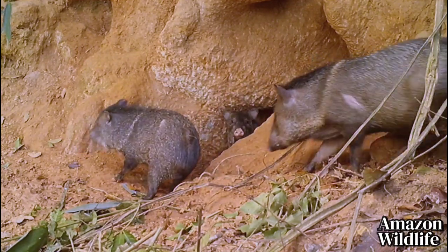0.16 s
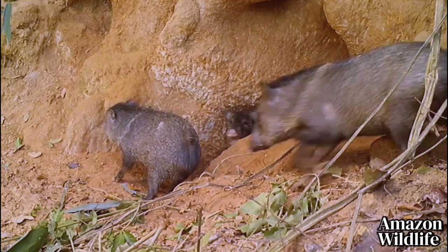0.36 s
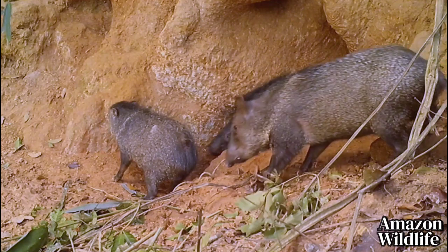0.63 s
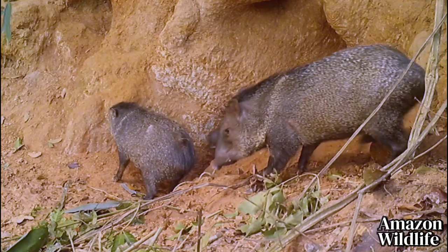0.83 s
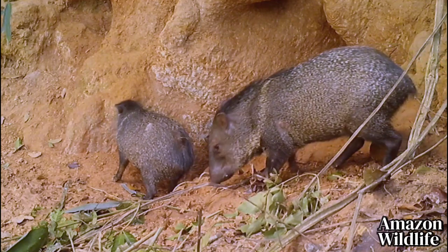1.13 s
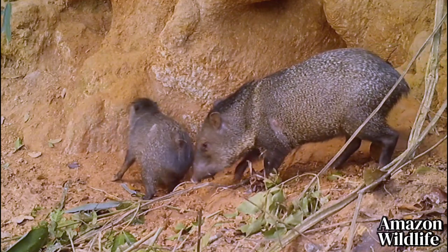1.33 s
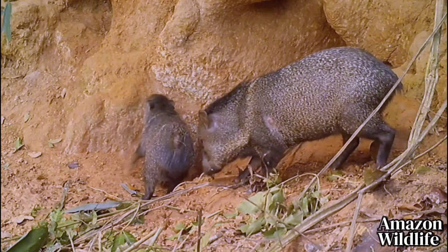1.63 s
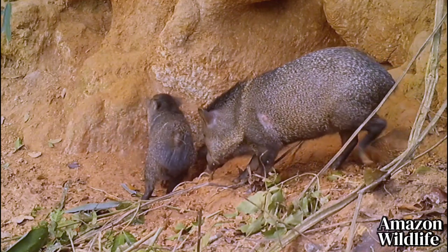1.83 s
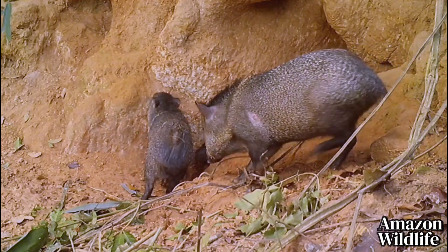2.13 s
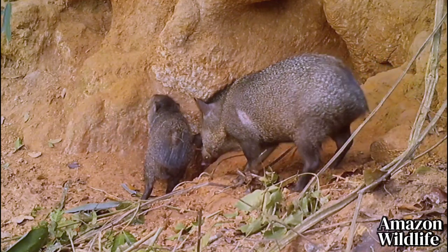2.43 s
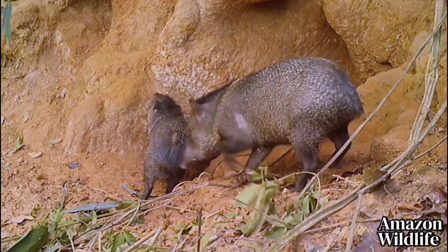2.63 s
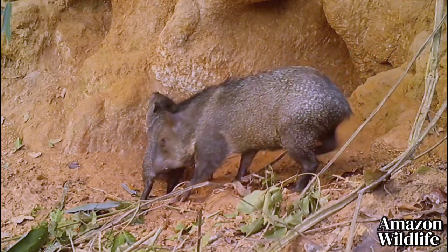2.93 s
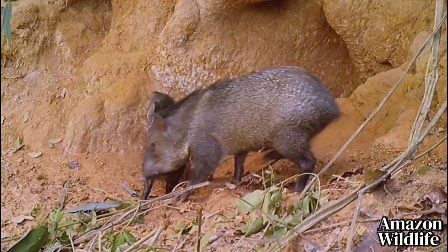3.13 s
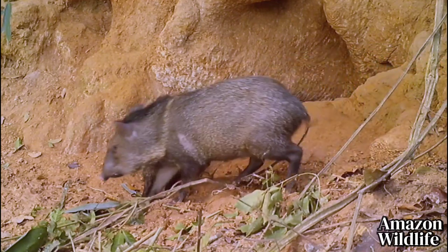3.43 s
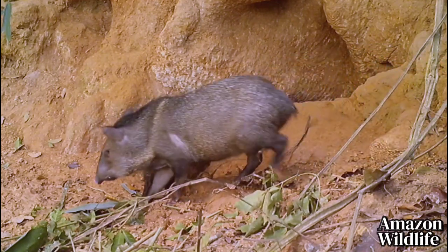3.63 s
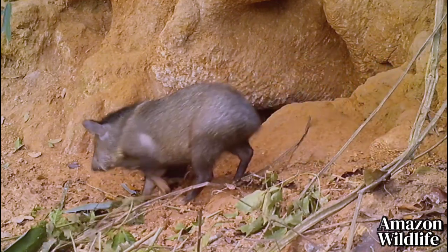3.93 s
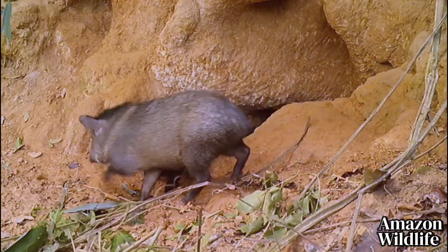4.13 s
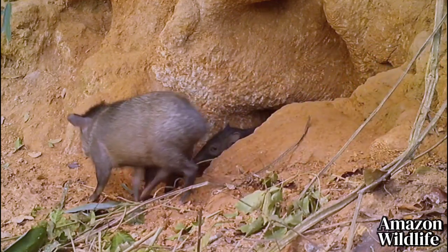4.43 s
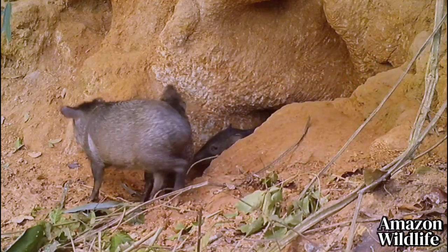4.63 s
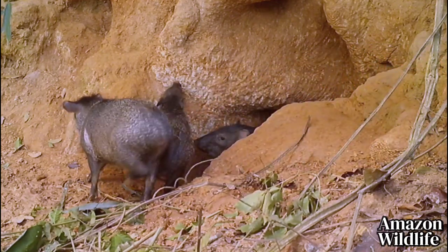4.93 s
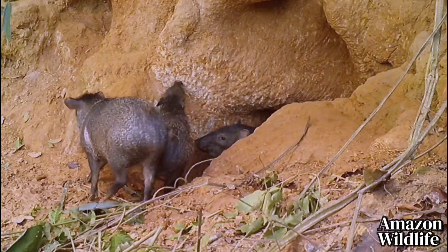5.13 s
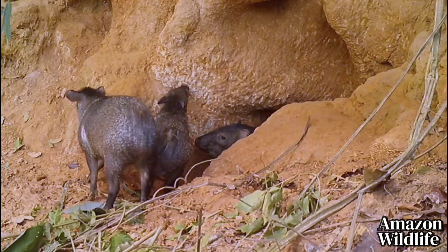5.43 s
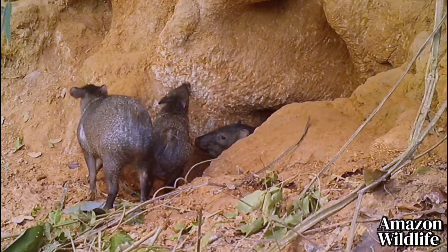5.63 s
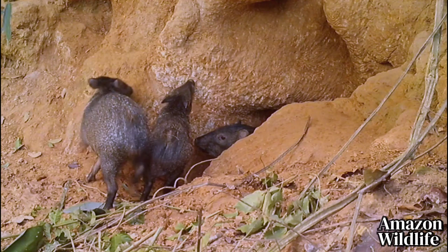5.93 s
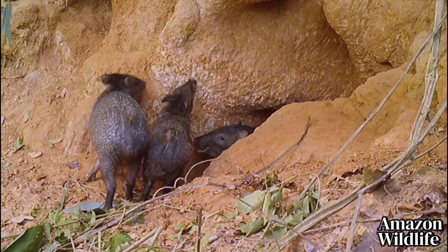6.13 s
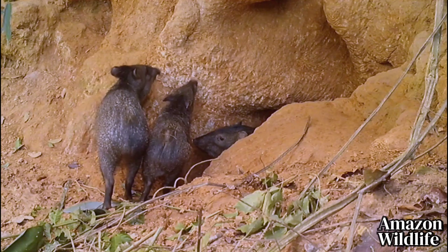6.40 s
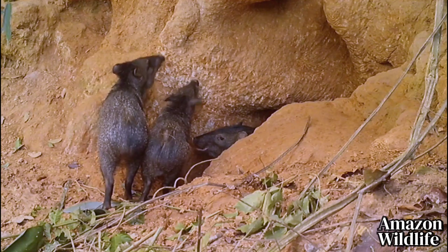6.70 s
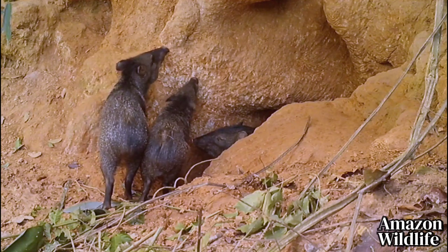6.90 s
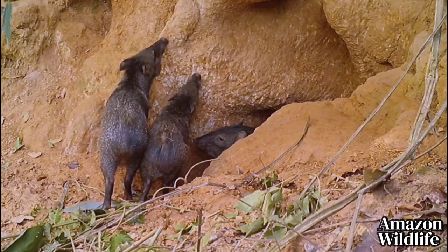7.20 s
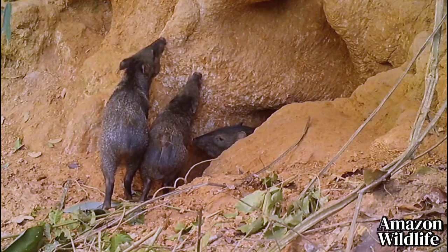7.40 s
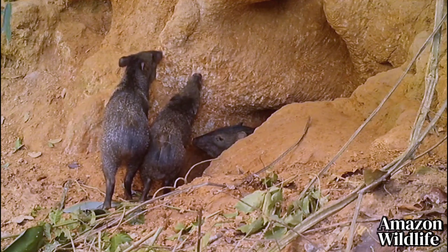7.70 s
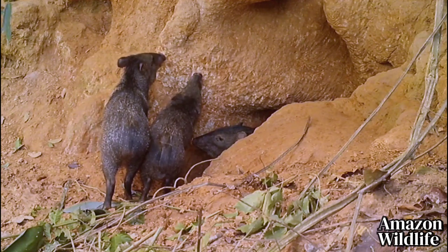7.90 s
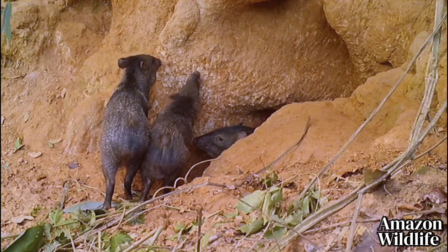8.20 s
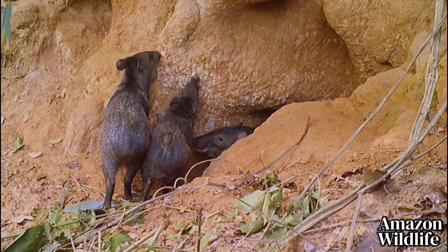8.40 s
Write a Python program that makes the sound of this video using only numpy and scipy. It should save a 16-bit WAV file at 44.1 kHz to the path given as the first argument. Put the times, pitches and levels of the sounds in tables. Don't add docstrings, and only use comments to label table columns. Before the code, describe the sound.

In a tropical forest by a clay bank, two kinds of small singers chirp without pause: buzzy rising chirps near four kilohertz and thinner, quieter trills above five, blurred by trees. Close by, peccaries scuff crisp leaves and snap twigs, with a bright cluster in the first second, scattered cracks after, and a burst just before five seconds. Faint birds coo and whistle behind; two tiny grunts come later. Single-channel pickup, close to the animals, treble softened.

```python
import sys
import numpy as np
from scipy import signal
from scipy.fft import rfft, irfft, next_fast_len
from scipy.io import wavfile
from scipy.ndimage import uniform_filter1d, map_coordinates

SR = 44100
rng = np.random.default_rng(int(sys.argv[2]) if len(sys.argv) > 2 else 0)


def store_wav(level_fs):
    pcm = np.round(np.clip(np.atleast_2d(level_fs), -1, 1) * 32767)
    wavfile.write(sys.argv[1], SR, pcm.T.astype(np.int16))


def gain_from_decibels(decibels):
    exponent = np.asarray(decibels, float) / 20
    return 10 ** exponent


N = 377055


def unit(x):
    return x / np.sqrt(np.mean(x ** 2, axis=-1, keepdims=True) + 1e-20)


def peak_one(x):
    return x / np.abs(x).max(axis=1, keepdims=True)


def along(points, hz):
    f, v = np.transpose(points)
    return gain_from_decibels(np.interp(np.log(hz + 1), np.log(f + 1), v))


def wobble(rate, size=N):
    knots = rng.standard_normal(int(size * rate / SR) + 4)
    return map_coordinates(knots, [np.arange(size) * rate / SR])


def filtered(x, response):
    m = next_fast_len(x.shape[-1] + 8192)
    return irfft(rfft(x, m) * response(np.fft.rfftfreq(m, 1 / SR)), m)[..., :x.shape[-1]]


def resonance(centre_hz, width_hz):
    return lambda f: 1j * f * width_hz / (centre_hz ** 2 - f * f + 1j * f * width_hz)


def place(times, sounds):
    at = np.round(times * SR).astype(int)[:, None] + np.arange(sounds.shape[1])
    return np.bincount(at.ravel(), sounds.ravel(), N + SR)[:N]


def scattered(sounds, wet_db, t60):
    t = np.arange(round(SR * np.clip(2 * t60, .2, .5))) / SR
    tail = rng.standard_normal((len(sounds), len(t))) * gain_from_decibels(-60 * t / t60) * (t > .003)
    tail = tail / np.linalg.norm(tail, axis=1, keepdims=True)
    echo = signal.fftconvolve(sounds, tail, axes=1)[:, :len(t)]
    direct = np.pad(sounds, ((0, 0), (0, len(t) - sounds.shape[1])))
    return direct + gain_from_decibels(wet_db) * echo


def chorus():
    # f/Hz, density/dB per Hz
    air_spectrum = [(14, -28), (32, -1.5), (60, -9.5), (200, -13.5), (700, -11), (1500, -13), (2400, -13),
                    (3500, -14.5), (4600, -32.5), (6300, -18), (7500, -19.5), (9000, -17.5)]
    # f/Hz, width/Hz, level/dB
    bands = [(2800, 620, -64), (3904, 380, -61), (5460, 1020, -62)]
    hiss = unit(filtered(rng.standard_normal(N), lambda hz: along(air_spectrum, hz)))
    out = gain_from_decibels(-58.5 + 0.17 * wobble(2.2)) * hiss
    for hz, width, db in bands:
        band = filtered(rng.standard_normal(N), lambda f: resonance(hz, width)(f) ** 2)
        out = out + gain_from_decibels(db + 1.1 * wobble(5) + 1.7 * wobble(14)) * unit(band)
    return out


def crackle(centre_hz, spread, cycles, size_db, count):
    luck, t = rng.random((count, 3)), np.arange(400) / SR
    hz = centre_hz * np.exp(spread * rng.standard_normal((count, 1)))
    size = gain_from_decibels(-size_db * np.log(luck[:, 1:2] + 0.06))
    ticks = size * np.exp(-t * hz / cycles) * np.sin(2 * np.pi * hz * t)
    return unit(place(luck[:, 0] * N / SR, ticks))


def scuffs():
    # f/Hz, density/dB per Hz
    litter = [(180, -44), (300, -34), (476, -27), (518, -29.5), (1960, -10), (2480, -5.5), (2850, 5.5),
              (6890, -17.5), (8500, -33.5), (11000, -64.5), (18700, -120)]
    # t/s, drag length/s, effort level/dB, weight level/dB
    drags = [(0.294, 0.065, -57, -10), (0.38, .03, -50, -16), (0.452, 0.037, -41, -10),
             (0.516, 0.014, -44, -2), (0.93, 0.27, -58.5, -7), (1.553, 0.17, -57.5, -8),
             (1.887, 0.025, -57, -9), (2.411, 0.036, -49.5, -7), (2.593, 0.06, -51, -4),
             (2.727, 0.14, -56.5, -1.5), (3.385, 0.11, -50.5, -3), (3.62, 0.3, -58.5, -17),
             (3.977, .12, -51, -3), (4.367, 0.12, -58, -21), (4.612, 0.091, -54, 0), (4.79, .03, -53.5, -2),
             (5.308, 0.026, -54.5, 5.5), (5.646, 0.14, -62, -1), (6.595, 0.018, -54, -0.5),
             (6.757, 0.022, -53, -1.5), (7.598, 0.032, -50.5, -5.5), (8.04, 0.12, -63, -4),
             (8.406, 0.019, -65, 8.5)]
    rise_db_per_s, fall_db_per_s = 258, 131.5
    stir_db = -62.5
    s, length, effort_db, weight_db = np.transpose(drags)[:, :, None]
    t = np.arange(0, N / SR + .01, .002)
    before, after = np.maximum(s - t, 0), np.maximum(t - s - length, 0)
    drag = gain_from_decibels(effort_db - rise_db_per_s * before - fall_db_per_s * after)

    def level(each):
        total = np.sqrt(np.sum(each ** 2, axis=0) + gain_from_decibels(stir_db) ** 2)
        return np.interp(np.arange(N) / SR, t, total)

    def rustle(split):
        grain = rng.standard_normal(N) * gain_from_decibels(2.7 * wobble(500))
        return unit(filtered(grain, lambda hz: along(litter, hz) / np.sqrt(1 + split(hz))))

    crisp = rustle(lambda hz: (2200 / (hz + 1)) ** 6)
    crisp = crisp + 0.81 * crackle(3000, spread=0.297, cycles=4.6, size_db=4.0, count=5000)
    crisp = crisp + 0.4 * crackle(5650, spread=.22, cycles=1.6, size_db=4.5, count=4000)
    dull = rustle(lambda hz: (hz / 2100) ** 8)
    dull = dull + 0.44 * crackle(1793, spread=.18, cycles=4.3, size_db=5.0, count=4000)
    heavy = level(drag * gain_from_decibels(weight_db))
    return gain_from_decibels(-3.0) * (level(drag) * crisp + gain_from_decibels(0.4) * heavy * dull)


def singers(calls, length, climb_hz, start_hz, pulse_hz, depth, gain_db, wet_db, t60, lead, bend, rough, attack):
    s, db = np.transpose(calls)[:, :, None]
    luck = rng.standard_normal((len(calls), 4))
    t = np.arange(SR // 5) / SR
    u = np.clip(t / np.clip(length * (1 + 0.055 * luck[:, 3:]), .03, .19), 0, 1)
    hz = (start_hz + climb_hz * u ** bend) * (1 + 0.00423 * luck[:, :1])
    pace = pulse_hz * (1 + 0.1443 * luck[:, 1:2]) * (1 + .3 * u)
    beat = np.cos(2 * np.pi * np.cumsum(pace, axis=1) / SR + 2 * luck[:, 2:3])
    swell = np.abs(np.sin(np.pi * u ** 0.44)) ** attack
    rasp = rough * unit(uniform_filter1d(rng.standard_normal(hz.shape), size=90))
    carrier = np.sin(2 * np.pi * np.cumsum(hz, axis=1) / SR)
    tone = swell * (1 + depth * beat + rasp) * carrier
    return place(s[:, 0] - lead, scattered(gain_from_decibels(db + gain_db) * tone, wet_db, t60))


def high_singers():
    # t/s, peak level/dB
    first_calls = [(0.061, -46), (0.548, -47), (0.849, -56), (1.05, -52), (1.274, -47.5), (1.577, -53),
                   (1.879, -54), (2.149, -52.5), (2.378, -47), (2.616, -50), (2.75, -47), (3.134, -45.5),
                   (3.302, -49), (3.489, -45.5), (3.753, -46), (4.043, -47), (4.37, -46), (4.769, -47),
                   (5.134, -45), (5.407, -53.5), (5.579, -44.5), (6.083, -49), (6.384, -52), (6.704, -49.5),
                   (7.163, -49), (7.311, -48), (7.531, -51), (7.717, -47.5), (7.983, -49), (8.317, -47.5)]
    # t/s, peak level/dB
    more_calls = [
        (5.82, -53.5),
        (6.952, -61),
        (8.498, -45.5),
    ]
    return singers(first_calls + more_calls, length=.1, climb_hz=551, lead=.004, bend=.75, rough=0.84,
                   attack=0.55, start_hz=5227, pulse_hz=200.0, depth=2.36, gain_db=-14.0, wet_db=3.0, t60=0.77)


def low_singers():
    # t/s, peak level/dB
    first_singer = [(0.094, -42), (0.37, -48.5), (0.632, -40.5), (1.019, -42.5), (1.382, -40.5),
                    (1.718, -38.5), (2.043, -40.5), (2.38, -38.5), (2.784, -41.5), (3.121, -41.5),
                    (3.448, -37.5), (3.859, -42.5), (4.195, -43), (4.531, -42), (4.902, -41), (5.284, -40),
                    (5.68, -41), (6.071, -40.5), (6.385, -42.5), (6.719, -38.5), (7.114, -40.5),
                    (7.531, -40.5), (7.886, -40.5), (8.304, -40)]
    # t/s, peak level/dB
    second_singer = [(0.228, -40.5), (0.505, -41.5), (0.869, -50), (1.067, -41), (2.224, -42),
                     (2.62, -41.5), (3.033, -41), (3.789, -42), (4.038, -47), (4.265, -41), (4.68, -42.5),
                     (5.088, -42.5), (5.475, -44), (5.893, -44), (6.292, -41.5), (6.468, -46), (7.035, -53),
                     (7.413, -50), (7.582, -42.5), (7.738, -52), (7.951, -44.5), (8.1, -47), (8.504, -49)]
    return singers(first_singer + second_singer, length=.077, climb_hz=369, lead=.008, bend=.95, rough=0.43,
                   attack=0.62, start_hz=3863, pulse_hz=87.7, depth=0.59, gain_db=-8, wet_db=2.65, t60=0.85)


def snaps(breaks, crack_db, knock_db, t60, width):
    s, db, hz = np.transpose(breaks)[:, :, None]
    t = np.arange(SR // 10) / SR
    noise = rng.standard_normal((len(breaks), 4, len(t)))
    splinters = gain_from_decibels(3.5 * unit(uniform_filter1d(noise[:, 3], size=60)))
    fade = splinters * gain_from_decibels(-60 * t / t60) + 1.47 * np.exp(-t / 0.00048)
    ring = filtered(fade * noise[:, 0], lambda f: resonance(hz, width * hz)(f) ** 2)
    crack = filtered(fade * noise[:, 1],
                     lambda f: resonance(3200, 900)(f) ** 2 + 0.082 * resonance(5200, 4500)(f))
    knock = filtered(fade * noise[:, 2],
                     lambda f: resonance(900, 500)(f) ** 2 + 0.55 * resonance(480, 350)(f) ** 2)
    parts = peak_one(ring) + gain_from_decibels(crack_db + 9) * peak_one(crack) + gain_from_decibels(knock_db + 5.5) * peak_one(knock)
    return place(s[:, 0], scattered(gain_from_decibels(db - 6.0) * parts, wet_db=-3.0, t60=0.071))


def twigs():
    # t/s, peak level/dB, ring f/Hz
    dry_breaks = [(0.282, -39, 2500), (0.368, -37, 2580), (0.414, -25.5, 2740), (0.453, -23.5, 2640),
                  (0.546, -24, 3020), (0.664, -53, 2430), (0.909, -33, 2100), (0.918, -41, 1600),
                  (1.439, -34.5, 2650), (1.907, -36, 2010), (2.074, -54, 2500), (2.379, -33.5, 2590),
                  (2.405, -41, 2700), (2.417, -26.5, 2540), (2.564, -33, 2600), (2.628, -31.5, 2620),
                  (3.317, -35.5, 2220), (3.429, -36, 2120), (4.68, -35.5, 1490), (4.687, -35, 3200),
                  (5.322, -37, 1910), (5.334, -39, 1600), (3.985, -43, 3400), (6.608, -41, 3000),
                  (6.905, -41, 3300), (7.593, -36, 3200), (8.48, -48, 2520), (8.523, -32, 3100)]
    return snaps(dry_breaks, crack_db=-6.5, knock_db=-30, t60=.024, width=.5)


def pops():
    # t/s, peak level/dB, ring f/Hz
    damp_breaks = [(0.396, -30.5, 1620), (0.487, -33, 2280), (0.886, -39, 1700), (1.883, -43, 1440),
                   (2.099, -42, 2000), (3.381, -31, 2100), (3.939, -37, 2170), (4.312, -39.5, 1480),
                   (4.349, -44.5, 1180), (4.707, -33, 1970), (4.8, -39, 1570), (4.817, -27, 1850),
                   (4.826, -25.5, 2130), (4.833, -36, 1500), (5.114, -41, 2580), (5.262, -43, 2050),
                   (5.482, -28.5, 2180), (6.234, -34.5, 1890), (6.599, -36, 1880), (6.903, -34.5, 1850),
                   (8.521, -28.5, 1800), (7.69, -44, 1650), (6.988, -40, 1900), (7.09, -38, 2000),
                   (7.362, -39, 2140), (8.075, -29, 1720), (8.08, -32, 1700)]
    return snaps(damp_breaks, crack_db=-15, knock_db=-25, t60=.034, width=.27)


def birds(calls, spread_hz):
    out = np.zeros(N)
    for s, length, start_hz, end_hz, db in calls:
        u = np.linspace(0, 1, round(length * SR))
        phase = 2 * np.pi * np.cumsum(start_hz + (end_hz - start_hz) * u) / SR
        in_phase = wobble(2 * spread_hz, len(u)) * np.cos(phase)
        quadrature = wobble(2 * spread_hz, len(u)) * np.sin(phase)
        swell = gain_from_decibels(db + wobble(15, len(u))) * np.abs(np.sin(np.pi * u)) ** .3
        out[round(s * SR):][:len(u)] += swell * (in_phase + quadrature)
    return out


def coos():
    # t/s, length/s, start f/Hz, end f/Hz, level/dB
    hoarse_calls = [
        (2.55, .35, 960, 850, -65.5),
        (2.95, .45, 900, 850, -67),
        (2.8, .62, 1030, 1030, -67),
        (3.4, .85, 820, 750, -71),
        (4.85, .12, 2850, 2780, -58),
        (5.58, .45, 2800, 2850, -67),
        (1.5, .26, 3420, 3450, -62),
        (8.09, .17, 3560, 3520, -62),
        (7.05, .35, 2320, 2300, -68),
    ]
    return birds(hoarse_calls, spread_hz=100)


def clods():
    # t/s, peak level/dB, ring f/Hz
    hoof_knocks = [(1.689, -41, 2470), (2.819, -40.5, 1430), (3.489, -41, 2300), (3.565, -40, 1710),
                   (3.662, -46, 2090), (3.781, -40.5, 1840), (4.209, -48.5, 830), (4.586, -37.5, 2550),
                   (4.851, -36, 1050), (8.07, -38, 990), (5.329, -33, 2000), (5.875, -41, 2100),
                   (7.981, -45, 2460), (8.067, -31, 1900)]
    return snaps(hoof_knocks, crack_db=-12, knock_db=-12, t60=.01, width=.5)


def stamp():
    start_s, length_s, hz, db = 1.99, .15, 60, -65
    t = np.arange(N) / SR - start_s
    return gain_from_decibels(db) * np.sin(np.pi * np.clip(t / length_s, 0, 1)) * np.sin(2 * np.pi * hz * t)


def whistles():
    # t/s, length/s, start f/Hz, end f/Hz, level/dB
    clear_calls = [
        (3.05, .28, 2330, 2200, -66),
        (8.1, .42, 2330, 2290, -65),
        (5.92, .13, 3340, 3450, -65),
    ]
    return birds(clear_calls, spread_hz=30)


def grunts():
    # t/s, level/dB, pitch f/Hz, snout f/Hz, chest level/dB
    throat_calls = [
        (6.067, -58, 131.6, 637, -5),
        (7.11, -56, 126, 490, 2),
    ]
    out, t = np.zeros(N), np.arange(N) / SR
    for s, db, pitch_hz, snout_hz, chest_db in throat_calls:
        u = np.clip((t - s) / 0.051, 0, 1)
        gate = np.abs(np.cos(np.pi * pitch_hz * (t - s) * (1 + 0.18 * u))) ** 12
        pulses = np.abs(np.sin(np.pi * u ** 0.35)) * gate * (1 + 1.07 * wobble(1500))

        def tract(f):
            snout = resonance(snout_hz, 250)(f) ** 2
            throat = 0.7 * resonance(400, 250)(f) ** 2
            chest = gain_from_decibels(chest_db - 1.5) * resonance(135, 70)(f) ** 2
            return snout + throat + chest

        voice = filtered(pulses, tract)
        out += gain_from_decibels(db + 10.5) * voice / np.abs(voice).max()
    return out


def scene():
    forest = chorus() + high_singers() + low_singers()
    herd = scuffs() + twigs() + pops() + clods() + stamp() + grunts()
    return (forest + herd + coos() + whistles())[None]


def top_cut(x):
    return signal.sosfilt(signal.butter(12, 15490, fs=SR, output="sos"), x)


def record(dry):
    edge_hz, edge_db = 7070, 8.5

    def roll_off(hz):
        above_khz = np.maximum(hz - edge_hz, 0) / 1000
        return gain_from_decibels(np.maximum(-edge_db * above_khz ** 2, -90))

    hiss = gain_from_decibels(-84.0) * rng.standard_normal(dry.shape)
    return top_cut(filtered(dry, roll_off) + hiss)


dry = scene()
out = record(dry)
store_wav(out)
```